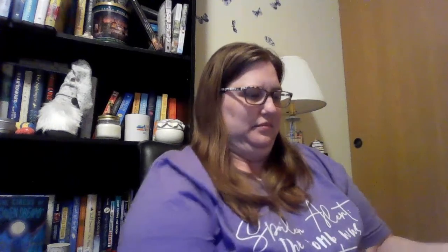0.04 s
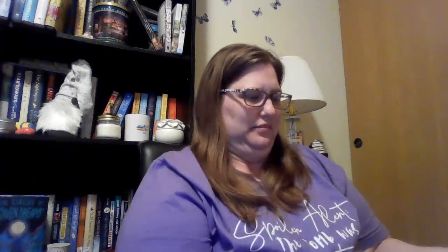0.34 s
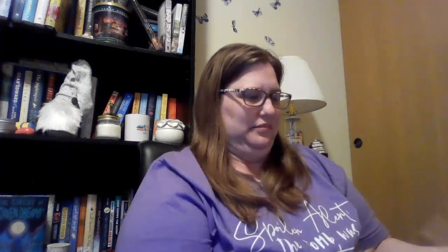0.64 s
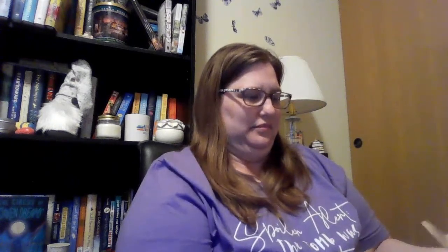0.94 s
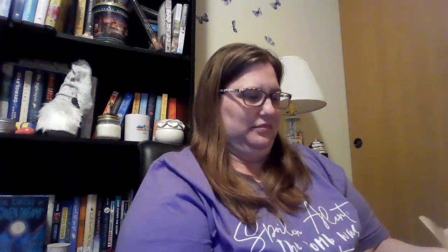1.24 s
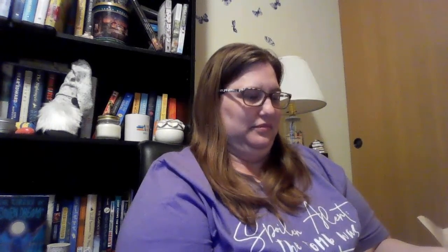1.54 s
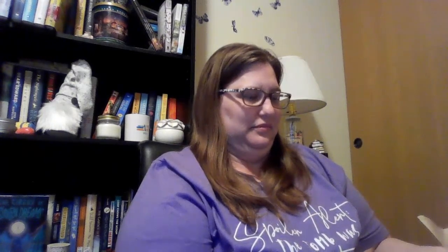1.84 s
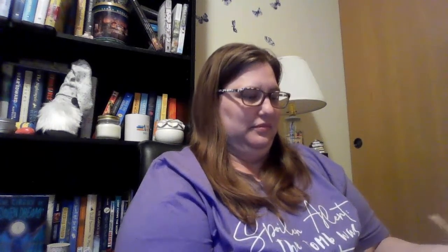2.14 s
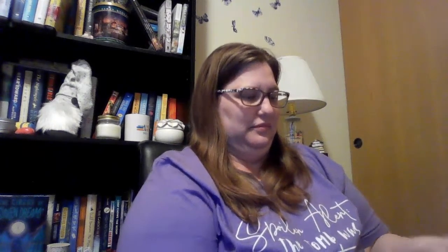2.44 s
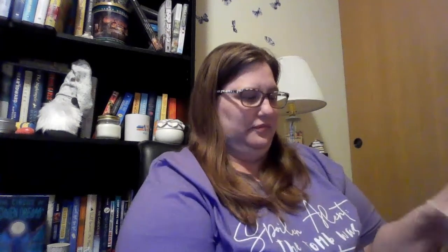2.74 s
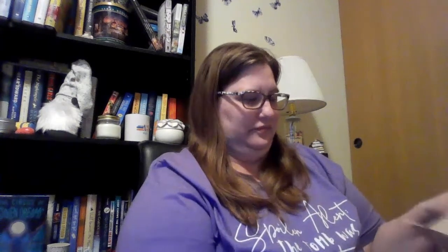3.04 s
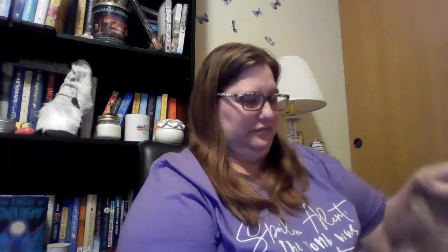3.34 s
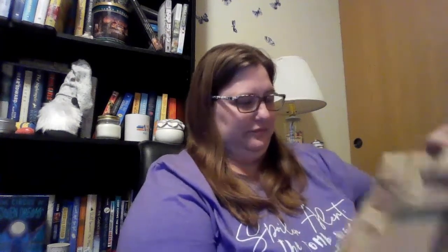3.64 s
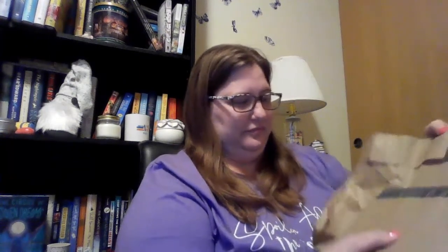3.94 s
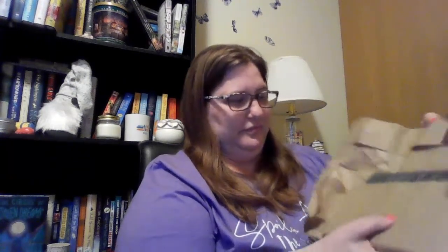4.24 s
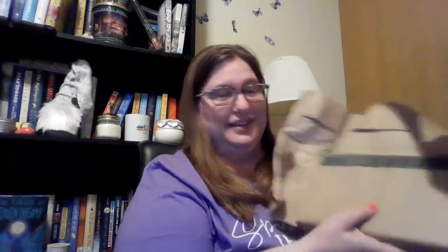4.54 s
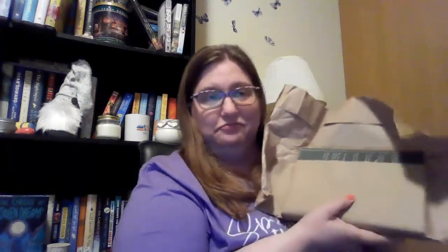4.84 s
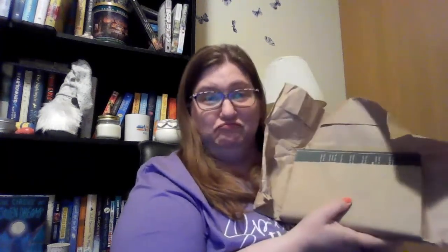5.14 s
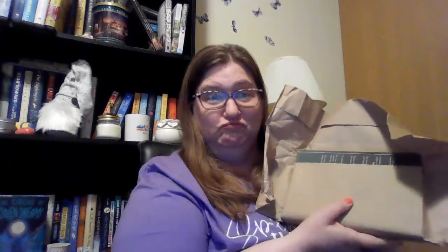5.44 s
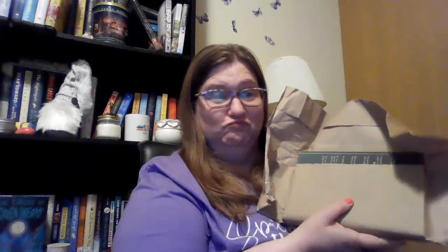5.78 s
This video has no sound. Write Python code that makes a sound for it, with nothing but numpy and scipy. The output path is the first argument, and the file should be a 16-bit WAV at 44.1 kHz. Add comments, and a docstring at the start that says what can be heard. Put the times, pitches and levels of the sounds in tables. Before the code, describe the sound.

A paper-wrapped parcel is tugged out of stiff packaging at a desk. It starts with a loud burst of crackling and bright sliding hiss, then nearly goes quiet. A second, longer spell of crumpling follows, with sharp snaps and hollow pops. Finally the parcel is lifted and turned, with softer crinkles, finger brushes and light taps. The microphone is close, in a small furnished room with a faint rumble.

```python
"""Unpacking a paper parcel

A parcel in brown paper is slid and tugged out of stiff packaging at a desk, then lifted and turned.
Creases crackle as they give way, sliding sheets hiss brightly, panels flex and buckle with hollow
pops, and single folds snap over. It all sits close up in a small furnished room with a soft rumble."""
import sys
import numpy as np
from scipy import signal
from scipy.fft import rfft, irfft, next_fast_len
from scipy.io import wavfile
from scipy.ndimage import uniform_filter1d, map_coordinates

SR = 44100
rng = np.random.default_rng(int(sys.argv[2]) if len(sys.argv) > 2 else 0)


def unload_wav(signal):
    """Save mono or channel-first audio to the path in sys.argv[1] as 16-bit WAV at rate SR, clipped to [-1, 1]."""
    wavfile.write(
        sys.argv[1],
        SR,
        np.round(np.clip(np.atleast_2d(signal).T, -1, 1) * 32767).astype(np.int16),
    )


N = 260631

# Levels are relative within each layer.
# room tone, rumble up to hiss: f/Hz, level/dB
ROOM_TONE = [(25, -18), (60, -2.5), (95, -9), (160, 1.5), (300, -4.5), (480, -8), (800, -23), (2000, -26),
             (4000, -29.5), (8000, -27), (14000, -22.5), (16000, -24.5)]
# decay of the room's tail: f/Hz, t60/s
ROOM_DECAY = [(150, 0.42), (600, 0.07), (3000, 0.22), (8000, 0.077), (14000, 0.054)]

# friction moves: t/s at top speed, speed-up/s, slow-down/s, level/dB
RUB_MOVES = [(2.02, 0.18, .12, -72.5), (4.32, 0.4, 0.33, -65.5)]  # the hands change grip
FINGER_STROKES = [(4.49, 0.051, 0.14, -42), (4.64, 0.14, 0.13, -41), (4.98, 0.32, 0.46, -53),
                  (5.89, 0.088, .06, -48.5)]  # fingers brush the wrapping
PARCEL_SLIDES = [(.13, .13, 0.037, -17), (.362, .05, .05, -19.5), (.7, .16, 0.17, -37),
                 (1.16, .06, .17, -57), (2.11, .02, 0.034, -49), (2.18, .04, 0.026, -44),
                 (2.41, .13, 0.091, -34), (2.503, .002, .026, -19.5), (2.62, .08, 0.09, -42.5),
                 (2.772, .07, .055, -37.5), (2.98, .08, .22, -48.5), (3.302, .013, 0.069, -20),
                 (3.46, .07, 0.11, -32.5), (3.8, .08, .05, -36.5), (4.0, 0.12, .065, -55),
                 (4.16, .025, 0.018, -56.5)]  # the parcel drags against the packaging
# presses: t/s at full force, rise/s, hold/s, flex level/dB, crumple level/dB
PARCEL_GRIPS = [(4.495, 0.042, 0.024, -53, -55), (4.57, 0.071, 0.017, -57.5, -56.5),
                (4.716, 0.034, 0.016, -42, -39), (4.765, 0.09, 0.083, -44, -52),
                (4.93, 0.09, 0.11, -49, -54.5), (5.07, .1, 0.049, -55, -56.5),
                (5.17, 0.023, 0.12, -51, -63), (5.32, 0.13, .15, -60, -64.5),
                (5.9, 0.081, 0.033, -45, -47.5)]  # fingers tighten on the raised parcel
PACK_PUSHES = [(.02, .05, .05, -48, -51), (.13, 0.063, 0.068, -28, -20.5), (.208, 0.017, 0.025, -33, -30.5),
               (.33, 0.046, .063, -28, -19), (.436, 0.027, 0.015, -29, -22), (.5, .05, 0.083, -43.5, -33.5),
               (.622, 0.011, 0.047, -28.5, -21.5), (.708, 0.032, 0.043, -25, -18.5),
               (.87, .08, 0.036, -43.5, -44), (1.12, 0.6, 0.25, -69, -64), (2.235, 0.13, 0.018, -43.5, -52),
               (2.395, 0.18, 0.039, -40, -38.5), (2.505, .004, 0.0077, -27.5, -23),
               (2.54, 0.054, 0.0072, -33, -31.5), (2.755, 0.17, 0.023, -42.5, -41),
               (2.93, 0.28, 0.35, -46, -52.5), (3.095, 0.11, 0.0053, -41, -49),
               (3.195, 0.055, 0.013, -34.5, -36.5), (3.22, 0.0089, 0.019, -24, -19.5),
               (3.264, 0.017, .015, -21.5, -19.5), (3.298, 0.016, 0.0308, -21, -17),
               (3.36, 0.022, .008, -35, -27), (3.49, 0.2, 0.11, -39.5, -37), (3.73, .015, 0.099, -50, -43),
               (3.92, 0.072, 0.062, -60, -65), (3.995, 0.018, 0.06, -49.5, -55.5),
               (4.1, 0.11, 0.52, -58.5, -68.5)]  # hands crush the stiff packaging
# panels buckling or being tapped: t/s, thud level/dB, thud f/Hz, crack level/dB
PANEL_POPS = [(.247, -18.5, 395, -22.5), (1.33, -52, 303, -58.5), (1.513, -50.5, 377, -50),
              (2.175, -39.5, 204, -45.5), (2.226, -31, 255, -35), (2.49, -29, 250, -31.5),
              (2.504, -22.5, 195, -31), (2.634, -34.5, 274, -42), (2.993, -45, 272, -37.5),
              (3.072, -32.5, 212, -37.5), (3.19, -24.5, 240, -60), (3.319, -14, 223, -23),
              (3.486, -25.5, 228, -34.5), (3.659, -31, 191, -42), (3.981, -36, 168.6, -33.5),
              (4.053, -43, 280, -61), (4.157, -48.5, 224, -61), (4.461, -41.5, 336, -37.5),
              (4.721, -30, 800, -55), (4.756, -33, 335, -41.5), (4.819, -31, 310, -49),
              (4.922, -40, 386, -48), (4.968, -35, 875, -67), (5.003, -30, 482, -42),
              (5.144, -36, 710, -54), (5.153, -28.5, 321, -54), (5.2238, -30.5, 345, -38),
              (5.229, -32.5, 513, -43.5), (5.89, -25, 497, -35.5), (5.898, -24, 626, -46)]
# single folds snapping over: t/s, level/dB, f/Hz, ringing share/0-1
FOLD_SNAPS = [(0.1323, -2, 7650, 0.12), (.2476, -11.5, 5910, 0.4), (.3096, -21, 7450, 0.3),
              (.3555, -22, 4260, 0.2), (0.3905, -25, 2940, .1), (0.4112, -15, 3900, 0),
              (.433, -18, 5340, 0), (0.4547, -15.5, 4600, 0.3), (0.495, -28, 2780, 0),
              (0.5124, -22, 7300, 0.08), (.554, -21, 3700, 0.78), (.62, -24, 6200, 0.6),
              (0.6385, -19, 4330, .25), (.663, -19.5, 5070, 0.2), (0.8741, -35.5, 5570, 0.3),
              (.908, -40, 1780, 0.4), (1.331, -48.5, 2980, 0.24), (1.5114, -23.5, 7820, 0.6),
              (2.136, -29, 9040, .4), (2.2235, -27.5, 9200, .35), (2.4868, -27, 3300, 0.6),
              (2.502, -16, 5760, 0), (2.6318, -30, 5460, .25), (2.9898, -35, 2600, .3),
              (3.0707, -33.5, 6840, 0), (3.22, -19, 3550, 0), (3.5635, -13, 7550, 0.05),
              (3.64, -29.5, 3280, 0.53), (3.712, -20.5, 2880, 0.47), (3.9777, -27.5, 4350, 0.42),
              (4.053, -41.5, 2120, 1), (4.434, -35, 1790, 0.56), (4.4622, -33, 4870, 0.1),
              (4.72, -31, 5470, 0), (4.8193, -43, 890, .7), (4.9334, -39, 4800, 0.8),
              (5.003, -39.5, 2530, 0.5), (5.229, -31, 4400, 0), (5.396, -52.5, 4130, .05)]

# resonances: f/Hz, width/Hz, level/dB
RUB_MODES = [(1930, 460, 3), (2480, 58, 9.5), (3520, 280, 3.5), (5270, 415, -10)]  # narrow bands of the rubbing
PACK_MODES = [(247, 26, -1.5), (366, 17, 0.5), (476, 16, 0.5), (990, 30, -6.5), (1230, 10, -3.5),
              (1335, 25, -0.5), (1415, 46, -3), (1620, 290, -3), (1964, 14, 3), (4150, 42, -13)]  # the packaging's cavity and walls
# tone colours: f/Hz, level/dB
PARCEL_FLEX_EQ = [(25, -43), (85, -24), (160, -3.5), (260, -0.5), (520, -3.5), (740, -11), (1100, -22),
                  (3000, -54)]  # soft body of the wrapping
PARCEL_CRUMPLE_EQ = [(250, -56), (700, -15), (1000, 7), (1300, -2), (2000, 4), (3200, -8.5), (6000, -7.5),
                     (10000, -16), (16000, -6)]  # creases in the wrapping
PACK_FLEX_EQ = [(25, -29), (85, -30.5), (130, -9), (190, -4), (300, -1.5), (480, -1.5), (660, -16.5),
                (1100, -36.5), (3000, -82)]  # low body of the packaging
PACK_CRUMPLE_EQ = [(200, -26), (650, -8), (830, -9.5), (1000, 0.5), (1500, -3), (2100, -3.5), (2900, -11.5),
                   (4400, -4), (8000, -9), (12000, -15.5), (16000, -21)]  # creases in the packaging
FRICTION_EQ = [(300, -34.5), (800, -27), (1200, -20), (2000, -7), (4000, -4.5), (8000, -0.5), (13500, 3.5),
               (16000, 0)]  # bright hiss of rubbed paper
CRACK_EQ = [(200, -23), (700, -8.5), (1200, 6), (2000, 8.5), (3200, 0.5), (6000, -5), (16000, -21.5)]  # papery edge of a pop


def amp(db):
    """Decibels to gain."""
    return 10 ** (np.asarray(db) / 20)


def unit(x):
    """Scale to rms 1."""
    return x / np.sqrt(np.mean(x ** 2) + 1e-20)


def along(points, hz):
    """Read a curve of (f/Hz, value) points on a log frequency axis."""
    freqs, values = np.transpose(points)
    return np.interp(np.log(hz + 1), np.log(freqs), values)


def wobble(knots_per_s):
    """A smooth random drift."""
    knots = rng.standard_normal(int(N * knots_per_s / SR) + 4)
    return map_coordinates(knots, [np.arange(N) * knots_per_s / SR])


def filtered(x, response):
    """Pass x through a complex frequency response."""
    size = next_fast_len(len(x) + SR // 4)
    return irfft(rfft(x, size) * response(np.fft.rfftfreq(size, 1 / SR)), size)[:len(x)]


def coloured(x, eq):
    """Shape x with an EQ curve, at rms 1."""
    return unit(filtered(x, lambda hz: amp(along(eq, hz))))


def resonance(hz, centre, width):
    """Causal response of one damped mode."""
    return 1j * hz * width / (centre ** 2 - hz ** 2 + 1j * hz * width)


def add(track, at, sound):
    """Mix a sound into the track, starting at a time in seconds."""
    part = track[max(round(at * SR), 0):][:len(sound)]
    part += sound[:len(part)]


def press_gains(presses, sag_db_per_s=9.5, relax_db_per_s=268, settle_db_per_s=290):
    """Flex and crumple envelopes: force builds, the paper yields under it, then it is let go."""
    t, power = np.arange(N) / SR, np.zeros((2, N))
    for at, rise, hold, flex_db, crumple_db in presses:
        force_db = 20 * np.minimum(t - at, 0) / rise - sag_db_per_s * np.clip(t - at, 0, hold)
        released_s = np.maximum(t - at - hold, 0)
        power[0] += amp(flex_db + force_db - relax_db_per_s * released_s) ** 2
        power[1] += amp(crumple_db + force_db - settle_db_per_s * released_s) ** 2
    return np.sqrt(power)


def friction_gain(moves, drop_db=12.5, roundness=1.3):
    """Friction envelope: each move swells as it speeds up and fades as it slows."""
    t, power = np.arange(N) / SR, np.zeros(N)
    for at, rise, fall, db in moves:
        from_peak = np.maximum((at - t) / rise, (t - at) / fall)
        power += amp(db - drop_db * from_peak ** roundness) ** 2
    return np.sqrt(power)


def crinkle(force, base_per_s, spread_db, life_s, rub, crowding=4.0):
    """Crackle at rms 1: creases give way in tiny random bursts over a bed of steady rubbing."""
    # the harder the press, the more creases give way
    starts = rng.random(N) < base_per_s * (1 + crowding * force / force.max()) / SR
    sizes = amp(spread_db * np.minimum(rng.standard_normal(N), 2))
    power = signal.lfilter([1], [1, -np.exp(-1 / (life_s * SR))], starts * sizes ** 2)
    # the hands feed in energy steadily; the creases share it out unevenly
    power /= np.abs(uniform_filter1d(power, size=1500)) + 1e-9
    return unit(np.sqrt(power + rub) * rng.standard_normal(N))


def room_tone():
    """A gently drifting bed of low room rumble and faint microphone hiss."""
    return amp(-59.0 + 0.86 * wobble(3.3)) * coloured(rng.standard_normal(N), ROOM_TONE)


def room_reverb(x, tail_db=-9.5, predelay_s=0.003, wall_db=-15.5, wall_delay_s=0.012):
    """The direct sound, one reflection off a near wall and a short diffuse tail."""
    hz, t, spectrum = signal.stft(rng.standard_normal(SR // 2), SR, nperseg=256)
    decay = amp(-60 * t / along(ROOM_DECAY, hz)[:, None])
    tail = signal.istft(spectrum * decay, SR, nperseg=256)[1]
    response = np.zeros(SR)
    add(response, predelay_s, amp(tail_db) * tail / np.linalg.norm(tail))
    add(response, wall_delay_s, amp([wall_db]))
    return x + signal.fftconvolve(x, response)[:N]


def rubbing():
    """Faint friction through a few narrow resonances as the hands change grip."""
    def modes(hz):
        return sum((-1) ** k * amp(db) * resonance(hz, centre, width)
                   for k, (centre, width, db) in enumerate(RUB_MODES))
    return friction_gain(RUB_MOVES) * unit(filtered(rng.standard_normal(N), modes))


def holding():
    """Fingers flex, crease and stroke the soft wrapping of the raised parcel."""
    flex, crumple = press_gains(PARCEL_GRIPS)
    stroke = friction_gain(FINGER_STROKES)
    flexing = crinkle(flex, base_per_s=42, spread_db=3.5, life_s=0.007, rub=0.2)
    crackle = crinkle(crumple, base_per_s=170, spread_db=4.5, life_s=0.0016, rub=0.5)
    hiss = crinkle(stroke, base_per_s=1200, spread_db=7.5, life_s=0.00044, rub=0.48)
    return (amp(2.0) * flex * coloured(flexing, PARCEL_FLEX_EQ)
            + amp(-1.5) * crumple * coloured(crackle, PARCEL_CRUMPLE_EQ)
            + amp(-3.0) * stroke * coloured(hiss, FRICTION_EQ))


def panel_pops(attack_s=0.0012, crack_rise_s=0.00079, crack_t60_s=0.06, t60_cycles=14.8, flutter_db=-5):
    """A panel buckles: a damped thud with a papery crack on top. Large, low panels ring longest."""
    out, t = np.zeros(N), np.arange(SR // 4) / SR
    for at, thud_db, pitch, crack_db in PANEL_POPS:
        # the whole panel swings at its lowest mode; loose parts flutter about an octave up
        swing = np.sqrt(2) * np.sin(2 * np.pi * pitch * t)
        noise = rng.standard_normal(len(t))
        flutter = unit(filtered(noise, lambda hz: resonance(hz, 2 * pitch, 0.64 * pitch) ** 2))
        thud_shape = amp(thud_db - 60 * t * pitch / t60_cycles) * (1 - np.exp(-t / attack_s))
        thud = (swing + amp(flutter_db) * flutter) * thud_shape
        crack_shape = amp(crack_db - 60 * t / crack_t60_s) * (1 - np.exp(-t / crack_rise_s))
        crack = coloured(rng.standard_normal(len(t)), CRACK_EQ) * crack_shape
        add(out, at, amp(3.0) * (thud + crack))
    return out


def stray_folds(per_s=80, offset_db=-0.5, spread_db=2.5, middle_hz=2517, octaves=0.55, ringing=0.57):
    """Small folds give way by chance, as loud as the push of the moment; rows like FOLD_SNAPS."""
    count = int(per_s * N / SR)
    starts = rng.integers(N, size=count)
    level_scatter, pitch_scatter = np.clip(rng.standard_normal((count, 2)), -2, 2).T
    _, crumple = press_gains(PACK_PUSHES)
    levels = 20 * np.log10(crumple[starts] + 1e-9) + offset_db + spread_db * level_scatter
    pitches = middle_hz * 2 ** (octaves * pitch_scatter)
    return [(at, db, pitch, ringing) for at, db, pitch in zip(starts / SR, levels, pitches)]


def fold_snaps(rise_s=0.0013, middle_hz=4000, middle_t60_s=0.0097, edge_db=-12, pitch_sag=0.046):
    """A fold flips within milliseconds; the smaller the facet, the higher and shorter its ring."""
    out, t = np.zeros(N), np.arange(SR // 25) / SR
    for at, db, pitch, ringing in FOLD_SNAPS + stray_folds():
        def facet(hz):
            return resonance(hz, pitch, pitch) + amp(edge_db) * resonance(hz, 7000, 12000)
        crack = unit(filtered(rng.standard_normal(len(t)), facet))
        t60 = middle_t60_s * (middle_hz / pitch) ** 0.71
        # the facet goes slack as it flips, so its pitch sags
        slack = 1 - pitch_sag * np.minimum(t / t60, 1)
        ring = np.sqrt(2) * np.sin(2 * np.pi * pitch * t * slack)
        share = min(ringing, 0.9)  # every snap keeps some crack
        snap = share * ring + np.sqrt(1 - share ** 2) * crack
        shape = np.minimum(t / rise_s, 1) * amp(-60 * np.maximum(t - rise_s, 0) / t60)
        add(out, at, amp(db + 2.5) * shape * snap)
    return out


def hollow(x, ring_db):
    """The packaging's cavity and walls ring along with whatever shakes them."""
    def modes(hz):
        return sum(amp(db) * resonance(hz, centre, width) for centre, width, db in PACK_MODES)
    return unit(filtered(x, lambda hz: 1 + amp(ring_db) * modes(hz)))


def unpacking():
    """Stiff packaging flexes and crackles as it is pushed open; the parcel drags along its inside."""
    flex, crumple = press_gains(PACK_PUSHES)
    slide = friction_gain(PARCEL_SLIDES)
    flexing = crinkle(flex, base_per_s=110, spread_db=-3.5, life_s=0.0018, rub=0.4)
    crackle = crinkle(crumple, base_per_s=130, spread_db=5, life_s=0.0012, rub=0.3)
    hiss = crinkle(slide, base_per_s=2500, spread_db=3.5, life_s=0.0005, rub=1.2)
    panels = hollow(coloured(flexing, PACK_FLEX_EQ), ring_db=-5.5)
    creases = hollow(coloured(crackle, PACK_CRUMPLE_EQ), ring_db=0.0)
    fibres = coloured(hiss, FRICTION_EQ)
    return flex * panels + amp(-2.0) * crumple * creases + amp(1.5) * slide * fibres


def scene():
    """Mono mix: each paper layer gets its own reverb tail and sits on the room tone."""
    layers = [unpacking(), holding(), rubbing(), fold_snaps(), panel_pops()]
    return (sum(room_reverb(layer) for layer in layers) + room_tone())[None]


def record(dry):
    """A small microphone sheds deep bass, rounds off the peaks and cuts the very top."""
    low_cut_hz, ceiling, top_hz = 95, 0.54, 16000
    thin = signal.sosfilt(signal.butter(2, low_cut_hz, "highpass", fs=SR, output="sos"), dry[0])
    rounded = thin / (1 + np.abs(thin / ceiling) ** 4) ** (1 / 4)
    return filtered(rounded, lambda hz: 1 / np.sqrt(1 + (hz / top_hz) ** 140))[None]


dry = scene()
out = record(dry)
unload_wav(out)
```